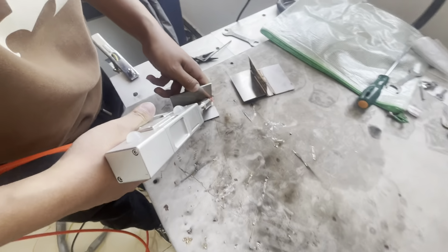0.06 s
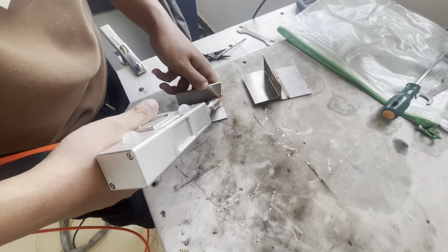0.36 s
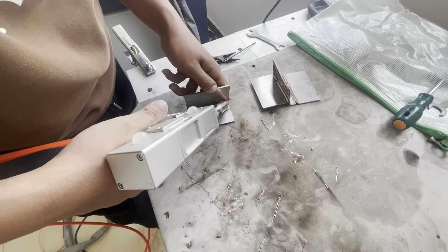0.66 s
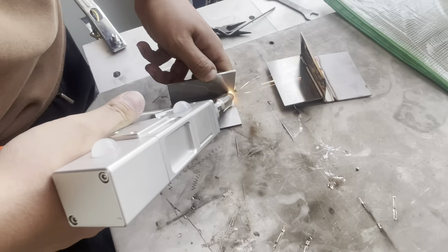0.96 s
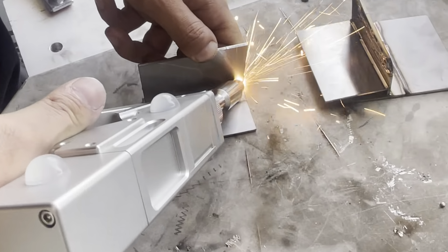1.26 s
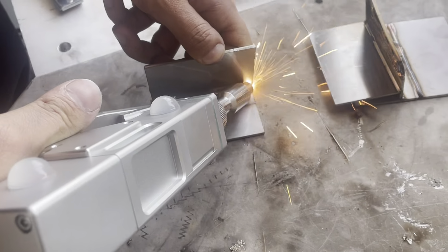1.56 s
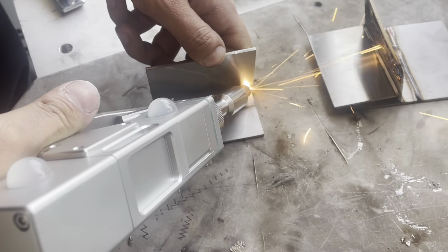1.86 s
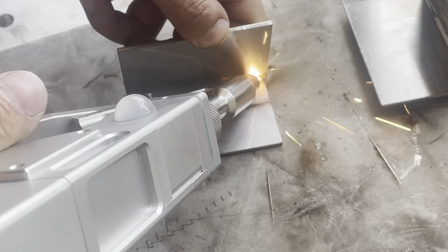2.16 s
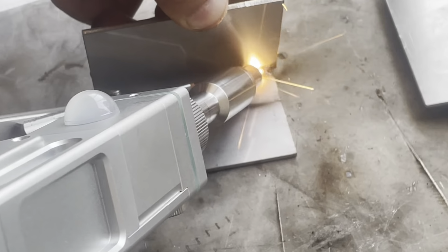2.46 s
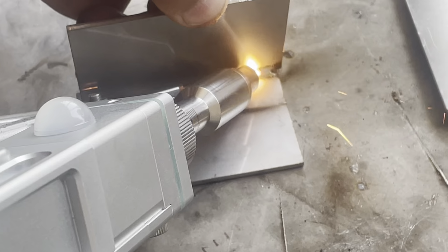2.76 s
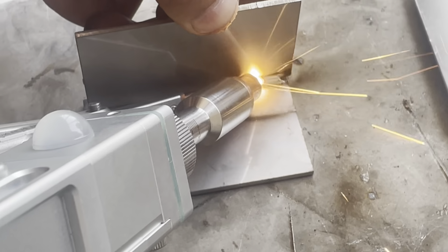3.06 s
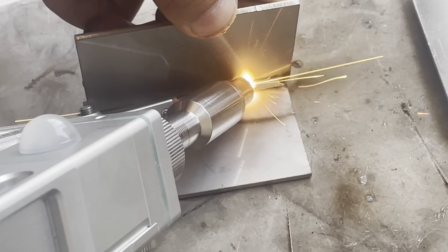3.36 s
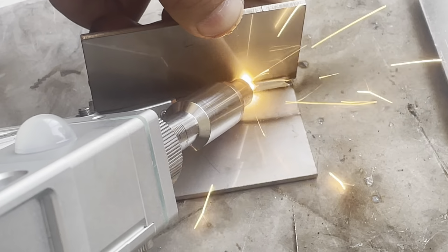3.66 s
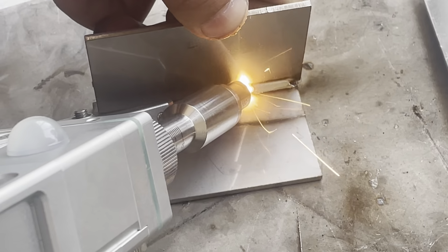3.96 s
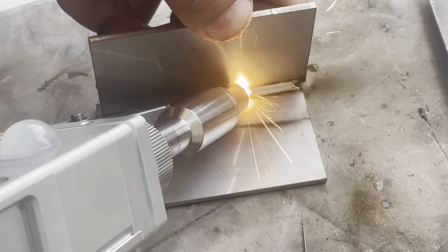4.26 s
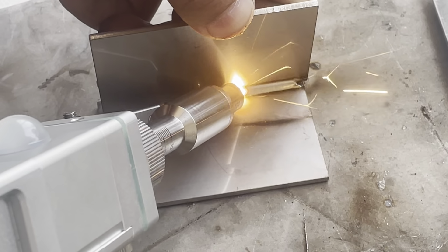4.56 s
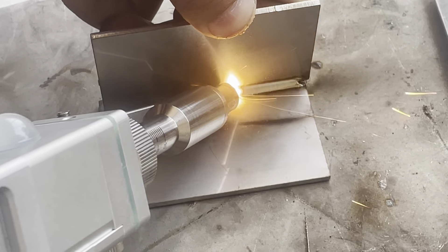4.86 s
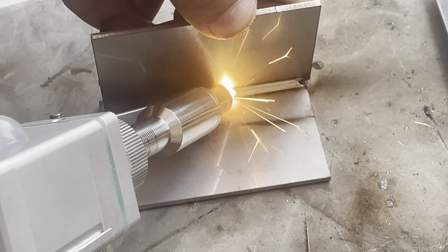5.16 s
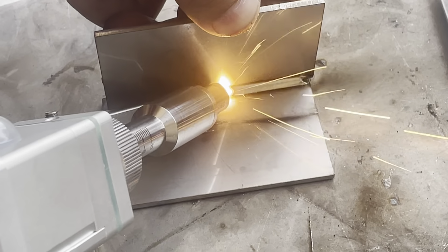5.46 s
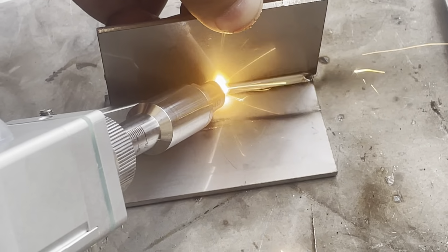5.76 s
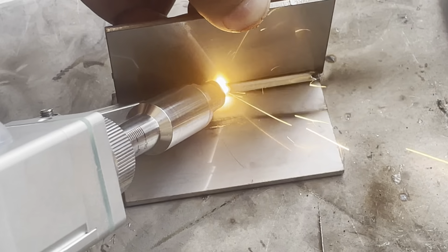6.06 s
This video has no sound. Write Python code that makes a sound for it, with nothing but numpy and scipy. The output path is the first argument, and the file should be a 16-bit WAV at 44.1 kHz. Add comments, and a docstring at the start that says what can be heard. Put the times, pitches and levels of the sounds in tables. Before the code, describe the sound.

A machine hum, a trigger click and a rush of gas, then a handheld laser welder sizzles steadily on steel.

```python
"""Handheld laser weld on a steel angle.

Over the machine's hum the trigger clicks, shield gas rushes out with a thump, and the beam strikes.
The beam sweeps the corner 37 times a second, so the vapour plume sizzles in throbs and spits sparks.
The phone zooms in on the weld: hum and gas fade, the stereo image narrows."""
import sys
import numpy as np
from scipy import signal
from scipy.fft import rfft, irfft, next_fast_len
from scipy.io import wavfile
from scipy.ndimage import uniform_filter1d

SR = 44100
rng = np.random.default_rng(int(sys.argv[2]) if len(sys.argv) > 2 else 0)


def int16_out(signal):
    """Quantize to a 16-bit WAV file."""
    q = np.round(np.clip(np.atleast_2d(signal).T, -1, 1) * 32767)
    wavfile.write(sys.argv[1], SR, q.astype(np.int16))


N = 269892
T = np.arange(N) / SR
FFT_SIZE = next_fast_len(N + SR // 4)
HZ = np.fft.rfftfreq(FFT_SIZE, 1 / SR)

GAS_ON_S, THUMP_S, BEAM_ON_S = 0.5445, 0.570, 0.831
SWEEP_HZ = 37.0

# audio zoom steps: (start [s], duration [s], share of full zoom [-])
ZOOM_STEPS = [(0.996, 0.31, 0.59), (2.12, 0.94, 0.45)]
# microphone ports, wide and zoomed: (frequency [Hz], left lead [rad], coherence [0-1], L-R [dB])
IMAGE_WIDE = [(99, 0.5, 0.93, -6), (550, 2, 0, 4.5), (1420, 2, 0.37, 1), (2680, 4.5, 0.94, -1.5),
              (4300, -0.5, 0.97, -2), (4670, 1, 0, 8), (5900, -1, 0.4, 1), (7260, -2, 0.73, 1.5),
              (9530, -4.5, 0.8, -1.5), (10600, -6.5, 1, -6), (11900, -5, 0.9, 1), (13800, -9.5, 0.93, 0)]
IMAGE_ZOOMED = [(100, 0, .98, 0), (700, .15, .93, 2), (1450, .6, .75, 7), (1800, 0, .75, 0),
                (2000, 0, 1, 0), (6000, 0, 1, 0), (7200, -1.3, .92, 0), (8200, -3.14, 1, 0),
                (10200, -4.9, .95, 0), (10900, -6.28, 1, 0), (11900, -6.28, 1, 0), (13300, -7.8, .8, 0),
                (14100, -9.1, .97, 0), (14800, -9.42, 1, 0)]
# narrow peaks and notches that colour the gas hiss and sizzle: (frequency [Hz], width [Hz], gain [dB])
HISS_COLOUR = [(750, 35, -5), (1120, 40, -5), (1430, 45, 2), (1605, 40, -4.5), (1790, 50, -11),
               (2130, 22, -4), (2290, 35, 2.5), (2660, 40, -4), (4220, 50, 3), (4330, 35, -3),
               (4750, 210, 8.5), (5085, 96, -9), (6480, 40, 3), (6870, 116, 4.5), (7245, 97, -5),
               (7800, 150, 5), (8130, 110, -12), (8550, 150, 2.5), (9030, 330, 3.5), (9500, 90, -2),
               (9900, 190, 4), (10690, 175, -8), (11490, 90, -6), (12440, 350, 3.5), (13830, 250, -9),
               (14970, 400, 11)]
# machine hum: (harmonic [-], relative level [dB], share of the fade [-])
HUM_HARMONICS = [(1, 1, 1), (2, -10, 0.31), (3, -18, 1), (4, -6, 0.72), (5, -23, 1), (6, -22, 1),
                 (7, -22, 0.6), (8, -25, 1), (9, -23, 1)]
# electronics whine: (frequency [Hz], level before zoom [dB])
WHINE_TONES = [(2406, -68), (2676, -75), (3079, -72), (3208, -76), (3343, -72.5), (3747, -75), (4280, -76),
               (5351, -81), (8662, -87), (9200, -76), (9733, -89), (10804, -79)]
# workshop air: (frequency [Hz], relative density [dB])
AIR_SPECTRUM = [(20, -18), (35, -13), (55, 1.5), (90, -8), (170, -11.5), (270, -5), (500, -12), (900, -22),
                (2400, -21), (6000, -40.5), (8000, -38), (11000, -45), (14000, -75)]
# steady drone: (frequency [Hz], width [Hz], level [dB])
DRONE_BANDS = [(74.5, 13, -64), (131, 34, -65), (266.6, 12, -64.5), (517, 41, -67.5)]
# trigger clicks: (time [s], level [dB])
TRIGGER_CLICKS = [(0.5045, -35), (.509, -44)]
# click noise: (frequency [Hz], relative density [dB])
CLICK_SPECTRUM = [(300, -20), (1800, -8), (3000, 1), (5000, 5), (9000, 3), (16000, -26)]
# switch ring: (frequency [Hz], level re click [dB], t60 [s])
SWITCH_MODES = [(3140, 3, 0.014), (3500, -10, .014), (4400, -24, .06), (5200, 2, 0.014), (5760, -20, 0.08)]
# valve crack, steady gas, first spurt: (frequency [Hz], relative density [dB])
CRACK_SPECTRUM = [(300, -6), (2500, -16), (4200, -11), (5200, -24), (6000, -3), (7200, -17), (8200, 13),
                  (9600, -3), (10700, 8), (11800, -22), (16000, -21)]
GAS_SPECTRUM = [(50, -12), (200, -8.5), (560, -4), (800, -6), (1480, -0.5), (1850, -4), (3700, -10),
                (4400, -9), (5700, -19), (6750, -11.5), (7250, -1), (7700, -9), (8100, -3), (8600, -13),
                (9200, -7), (9800, -8), (10700, -11), (11200, -8.5), (12000, -27), (13000, -22),
                (14500, -52)]
SPURT_SPECTRUM = [(200, -1), (1500, -6), (2500, 5), (4500, 2), (6000, -11), (7600, 6), (8800, 5),
                  (10500, -11), (12200, -28), (16000, -45)]
# nozzle bore: (frequency [Hz], width [Hz], relative level [dB], change with pool [dB])
BORE_MODES = [(4360, 210, -3, -15), (4600, 88, -6, -13), (4880, 290, 1, 9.5)]
# gas line thump: (frequency [Hz], relative level [dB], t60 [s])
THUMP_MODES = [(264, -25, 0.033), (272, -42, .25), (507, -26, 0.016), (548, -39.5, 0.44),
               (573, -17.5, 0.031), (1080, -27, 0.02), (1550, -32.5, 0.045)]
# gun and steel corner: (frequency [Hz], width [Hz], relative level [dB], change with beam [dB])
CORNER_MODES = [(267.6, 25, -8.5, 7), (548, 72, -2.5, -4.5), (1050, 120, -14.5, 9.5), (1298, 20, -10, 3.5),
                (1480, 71, -2, 0), (2420, 87, -16.5, 13.5), (2670, 63, -8, 6)]
# beam's first spit: (frequency [Hz], relative density [dB])
STRIKE_SPECTRUM = [(300, -12), (1500, 2), (3800, -2), (4900, 4), (5700, -6), (6800, -1), (8300, -8),
                   (10000, 6), (11300, -10), (13700, -10), (15200, 2)]
# plume flares: (place in sweep [0-1], width [sweeps], height on steel [dB], height on pool [dB])
SWEEP_FLARES = [(.19, .04, -6, -5.5), (.305, 0.038, 4.5, -4), (.42, .035, -12, -7), (.59, 0.033, 1.5, -4.5),
                (.795, 0.029, 6, -2), (.9, 0.046, -4, -3.5)]
# plume strength: (time [s], relative level [dB])
PLUME_LEVELS = [(0.84, -27), (0.95, -25.5), (1.52, -25), (1.72, -28), (1.81, -28.7), (1.92, -25),
                (3.1, -29.5), (4.2, -27.5), (6.0, -27.5)]
# plume sizzle, low puffs: (frequency [Hz], relative density [dB])
SIZZLE_SPECTRUM = [(100, -40), (1000, -23), (1750, -21), (2350, -11.5), (3200, -8), (6000, -4), (9000, 1),
                   (13000, -5.5), (15750, -9.5)]
PUFF_SPECTRUM = [(60, -20), (170, 0), (310, -6), (520, -0.5), (700, 3.5), (1050, -2.5), (1700, -9),
                 (3000, -30), (16000, -70)]
# plume buzz: (harmonic of the sweep [-], relative level [dB])
BUZZ_HARMONICS = [(2, -22), (3, -1), (4, -9), (5, -2), (6, -1.5), (7, -6), (8, -8), (9, -7), (10, -14)]
# droplets bursting on bare steel: (time [s], level [dB])
DROPLET_BURSTS = [(0.8708, -17), (0.899, -17), (1.008, -25), (1.1418, -17.5), (1.3583, -22)]
# extra peaks and notches at half zoom: (frequency [Hz], width [Hz], gain [dB])
MID_ZOOM_COLOUR = [(4140, 42, -3.5), (4150, 70, -3), (4980, 55, 2.5), (5200, 110, -3.5), (5780, 130, 1.5),
                   (6040, 51, -12), (6830, 70, 3), (7440, 70, -9)]


def amp(db):
    """Decibels to gain."""
    return 10 ** (np.asarray(db) / 20)


def unit(x):
    """Scale to rms 1."""
    return x / np.sqrt(np.mean(x ** 2) + 1e-20)


def noise_pair():
    """Two independent white noises."""
    return rng.standard_normal((2, N))


def filtered(x, gain):
    """Apply a gain per frequency bin."""
    return irfft(rfft(x, FFT_SIZE) * gain, FFT_SIZE)[..., :N]


def wander(rate_hz):
    """Smooth random drift, rms 1."""
    return unit(filtered(rng.standard_normal(N), 1 / (1 + (HZ / rate_hz) ** 4)))


def ramp(start_s, rise_s):
    """Linear rise from 0 to 1."""
    return np.clip((T - start_s) / rise_s, 0, 1)


def since(start_s):
    """Seconds elapsed; 0 before the start."""
    return np.maximum(T - start_s, 0)


def settle(start_s, tau_s):
    """1 until the start, then exponential decay."""
    return np.exp(-since(start_s) / tau_s)


def decay(start_s, t60_s):
    """1 until the start, then down 60 dB per t60."""
    return amp(-60 * since(start_s) / t60_s)


def ring(start_s, modes):
    """Damped sines, struck once."""
    t = since(start_s)
    return sum(amp(db) * decay(start_s, t60_s) * np.sin(2 * np.pi * hz * t) for hz, db, t60_s in modes)


def spectrum(rows):
    """Table columns per bin, interpolated over log frequency."""
    hz, *columns = np.transpose(rows)
    return [np.interp(np.log(HZ + 1), np.log(hz + 1), column) for column in columns]


def noise_gain(shape):
    """Spectrum table to gain per bin, rms 1."""
    return unit(amp(spectrum(shape)[0]))


def ripple_db(rows):
    """Bell-shaped peaks and notches per bin."""
    return sum(db * np.exp(-.5 * ((HZ - hz) / width_hz) ** 2) for hz, width_hz, db in rows)


def hiss_gain(shape, lo_hz, hi_hz):
    """Spectrum with narrow peaks and notches; gives white noise rms 1 in the band."""
    gain = amp(spectrum(shape)[0] + ripple_db(HISS_COLOUR))
    return gain / np.sqrt(np.mean(gain ** 2 * ((HZ > lo_hz) & (HZ < hi_hz))))


def zoom():
    """Audio zoom, 0 to about 1."""
    return sum(share * ramp(start_s, duration_s) for start_s, duration_s, share in ZOOM_STEPS)


def narrowing():
    """Share of the narrow image; takes over during the first zoom step."""
    return ramp(1.08, rise_s=0.21)


def melt_pool():
    """Growth of the melt pool, 0-1."""
    return ramp(1.6, rise_s=0.3)


def ports(pair, gain, layout=IMAGE_WIDE):
    """Colour two independent signals and blend them into left and right."""
    lead_rad, coherence, balance_db = spectrum(layout)
    coherence = np.clip(coherence, 0, 1)
    left = gain * amp(balance_db / 2)
    right = gain * amp(-balance_db / 2) * np.exp(-1j * lead_rad)
    shared = filtered(pair[0], right * coherence)
    separate = filtered(pair[1], right * np.sqrt(1 - coherence ** 2))
    return np.array([filtered(pair[0], left), shared + separate])


def zoomed_ports(pair, gain):
    """Crossfade from the wide image to the narrow one."""
    narrow = narrowing()
    return (1 - narrow) * ports(pair, gain) + narrow * ports(pair, gain, IMAGE_ZOOMED)


def resonances(pair, modes, change):
    """Noise drives modes whose levels shift as change goes from 0 to 1."""
    before = after = 0
    for hz, width_hz, db, change_db in modes:
        peak = unit(1 / (1 + (2 * (HZ - hz) / width_hz) ** 2) ** 1.55)
        before = before + peak * amp(db)
        after = after + peak * amp(db + change_db)
    return zoomed_ports((1 - change) * filtered(pair, before) + change * filtered(pair, after), 0.89)


def bench_echoes(pair, echo_db, count=14):
    """Early reflections off bench, plates and gun ripple the hiss."""
    delays_s = rng.uniform(0.0011, 0.009, count)
    taps = np.zeros(N)
    taps[0] = 1
    taps[np.round(delays_s * SR).astype(int)] = rng.choice([-1, 1], count) * amp(echo_db)
    return filtered(pair, rfft(taps / np.linalg.norm(taps), FFT_SIZE))


def workshop(hum_hz=134, hum_db=-46, air_db=-49, zoom_db=-19.5):
    """Machine hum, electronics whine and room air fade with the zoom; a soft drone stays."""
    fade_db = zoom_db * zoom()
    phase_rad = 2 * np.pi * hum_hz * T + 0.042 * wander(2.4) + np.array([[0], [.12]])
    shimmer_db = 1.5 * wander(19)
    hum = 0
    for k, db, fade_share in HUM_HARMONICS:
        level_db = hum_db + db + fade_share * fade_db + (k > 1) * shimmer_db
        hum = hum + amp(level_db) * np.sin(k * phase_rad + 2 * np.pi * rng.random())
    whine = sum(amp(db + fade_db) * np.sin(2 * np.pi * hz * T) for hz, db in WHINE_TONES)
    air = zoomed_ports(noise_pair(), noise_gain(AIR_SPECTRUM)) * amp(air_db + 0.55 * fade_db)
    drone = 0
    for hz, width_hz, db in DRONE_BANDS:
        band = 1 / (1 + (2 * (HZ - hz) / width_hz) ** 2)
        drone = drone + amp(db) * unit(filtered(rng.standard_normal(N), band))
    return np.sqrt(2) * (hum + whine) + air + drone


def trigger(rise_s=0.0011, t60_s=0.009, tail_db=-22, tail_t60_s=0.54):
    """Dry clicks with a faint room tail; the first rings the switch."""
    envelope = 0
    for start_s, db in TRIGGER_CLICKS:
        peak_s = start_s + rise_s
        fall = decay(peak_s, t60_s) + amp(tail_db) * decay(peak_s, tail_t60_s)
        envelope = envelope + amp(db) * ramp(start_s, rise_s) * fall
    first_s, first_db = TRIGGER_CLICKS[0]
    switch = amp(first_db) * ring(first_s, SWITCH_MODES) * ramp(first_s, rise_s)
    return switch + ports(noise_pair() * envelope, noise_gain(CLICK_SPECTRUM))


def valve_crack(snap_db=-32, spit_db=-27):
    """The valve snaps open; stored pressure escapes in one bright spit."""
    opening = ramp(GAS_ON_S, 0.0011)
    snap = noise_pair() * amp(snap_db) * decay(GAS_ON_S, t60_s=0.032) * opening
    spit = noise_pair() * amp(spit_db) * decay(GAS_ON_S, t60_s=0.19) * opening
    return ports(spit, noise_gain(CRACK_SPECTRUM)) + ports(snap, 1)


def shield_gas(base_db=-35, start_db=-7, pool_db=-3.5, zoom_db=-12, spurt_db=-32):
    """Turbulent rush after a brighter spurt; dulls as the zoom begins."""
    opening = ramp(GAS_ON_S, 0.0032)
    level_db = base_db + start_db * settle(GAS_ON_S, 0.35)
    level_db += pool_db * melt_pool() + zoom_db * zoom()
    flow = amp(level_db + 1.5 * wander(93)) * opening
    turbulence = bench_echoes(noise_pair() * flow, echo_db=-16)
    rush = zoomed_ports(turbulence, hiss_gain(GAS_SPECTRUM, 290, 1980))
    highs = filtered(rush, 1 / (1 + (900 / (HZ + 1)) ** 6))
    dull_db = -3 * ramp(0.95, 0.14)
    spurt = noise_pair() * amp(spurt_db) * settle(GAS_ON_S, 0.14) * opening
    return rush + highs * (amp(dull_db) - 1) + ports(spurt, noise_gain(SPURT_SPECTRUM))


def nozzle_whistle(base_db=-33, start_db=-26, zoom_db=-26.5, flutter_db=1.2):
    """The bore whistles on three close resonances as the flow builds."""
    level_db = base_db + start_db * settle(GAS_ON_S, 0.11) + zoom_db * zoom()
    flow = amp(level_db + flutter_db * wander(27)) * ramp(GAS_ON_S, 0.01)
    return resonances(noise_pair() * flow, BORE_MODES, melt_pool())


def gas_thump(left_db=2.5, right_db=0.5):
    """The line comes up to pressure; the surge strikes a few low modes."""
    return ring(THUMP_S, THUMP_MODES) * ramp(THUMP_S, 0.002) * amp([[left_db], [right_db]])


def hollow_corner(base_db=-41.5, zoom_db=-20.5, gust_db=3.5):
    """Gas blows across gun and steel corner; the plume drives most of their modes harder."""
    flow = amp(base_db + zoom_db * zoom() + gust_db * wander(11)) * ramp(THUMP_S, 0.018)
    return resonances(noise_pair() * flow, CORNER_MODES, ramp(BEAM_ON_S, 0.005))


def beam_strike(spit_db=-18, ring_db=-27, ring_t60_s=0.037):
    """The beam bites cold steel: one bright spit, which rings the nozzle."""
    start_s = BEAM_ON_S + 0.00061
    spit = noise_pair() * (T > start_s) * amp(spit_db) * decay(start_s, t60_s=0.017)
    bore_hz = BORE_MODES[-1][0]
    return ring(start_s, [(bore_hz, ring_db, ring_t60_s)]) + ports(spit, noise_gain(STRIKE_SPECTRUM))


def sweep_pulse(place, width, skew=1.33):
    """One pulse per sweep, rising faster than it falls."""
    offset = (T * SWEEP_HZ - place + .5) % 1 - .5
    return np.exp(-.5 * (offset / (width * skew ** np.sign(offset))) ** 2)


def plume_throb(rest_db=-3, uneven_db=1.0):
    """Plume power, mean about 1: flares in each sweep, evened out by the pool; a sag at the turn."""
    pool = melt_pool()
    power = amp(rest_db) ** 2
    for place, width, steel_db, pool_db in SWEEP_FLARES:
        height = amp(steel_db + pool * (pool_db - steel_db) + uneven_db * wander(34))
        power = power + height ** 2 * sweep_pulse(place, width)
    power *= 1 - 0.75 * sweep_pulse(place=0.098, width=0.028)
    return power / uniform_filter1d(power, round(4 * SR / SWEEP_HZ))


def sizzle(throb, plume_db, trim_db=1.78, spits_per_s=1000, spit_db=9):
    """Vapour jets from the melt in fluttering throbs; bursting droplets add fine crackle."""
    spits = (rng.random(N) < spits_per_s / SR) * rng.uniform(0.37, 1, N)
    spits = spits * rng.choice([-1, 1], (2, N))
    jet = noise_pair() + amp(spit_db) * spits
    flutter_db = 0.5 * wander(310) + 0.49 * wander(7.9)
    jet *= np.sqrt(throb) * amp(plume_db + trim_db + flutter_db) * ramp(BEAM_ON_S, 0.0018)
    return zoomed_ports(bench_echoes(jet, echo_db=-26), hiss_gain(SIZZLE_SPECTRUM, 2000, 9140))


def seam_colour(hiss, zoom_db=6.5, sink_db_per_s=2.04, cold_db=-2, hot_db=2.4):
    """Brighter with the zoom; as the seam heats, the top sinks and the body fills in."""
    top = filtered(hiss, 1 / (1 + (10800 / (HZ + 1)) ** 24))
    body = filtered(hiss, 1 / (1 + (HZ / 3500) ** 8))
    top_db = zoom_db * zoom() ** 2 - sink_db_per_s * (T - BEAM_ON_S)
    body_db = narrowing() * (hot_db + (cold_db - hot_db) * settle(BEAM_ON_S, 1.9))
    return hiss + top * (amp(top_db) - 1) + body * (amp(body_db) - 1)


def puffs(throb, plume_db, base_db=-40.5, start_db=6.5, pool_db=-8.5, zoom_db=-8):
    """Flares shove the gas aside: a lumpy low sputter, strongest as the plume lights."""
    level_db = base_db + start_db * settle(BEAM_ON_S, 0.074) + 0.9 * (plume_db - plume_db.max())
    level_db += pool_db * melt_pool() + zoom_db * zoom()
    flow = np.sqrt(throb) * amp(level_db + 1.8 * wander(13)) * ramp(BEAM_ON_S, 0.002)
    return zoomed_ports(noise_pair() * flow, hiss_gain(PUFF_SPECTRUM, 100, 1200))


def buzz(base_db=-45.5, start_db=-27, pool_db=-11, zoom_db=-10, uneven_db=2.5):
    """Flares push the air: low harmonics of the sweep that swell, then calm on the pool."""
    tone = 0
    for k, db in BUZZ_HARMONICS:
        gain = amp(db + uneven_db * wander(4.1))
        tone = tone + gain * np.sin(2 * np.pi * (k * SWEEP_HZ * T + rng.random()))
    level_db = base_db + start_db * settle(BEAM_ON_S, 0.11)
    level_db += pool_db * melt_pool() + zoom_db * zoom()
    return np.sqrt(2) * tone * amp(level_db) * ramp(BEAM_ON_S, 0.011)


def spatter(rise_s=0.0026, t60_s=0.05, pop_db=-19):
    """Droplets burst from the melt, each a hard spit with a low pop."""
    envelope = sum(amp(db) * ramp(at_s, rise_s) * decay(at_s, t60_s) for at_s, db in DROPLET_BURSTS)
    gain = hiss_gain(SIZZLE_SPECTRUM, 2000, 9140) + amp(pop_db) * hiss_gain(PUFF_SPECTRUM, 100, 1200)
    return zoomed_ports(noise_pair() * envelope, gain)


def mid_zoom_colour(hiss):
    """Extra peaks and notches come and go in the hiss, deepest at half zoom."""
    depth = np.clip(4 * zoom() * (1 - zoom()), 0, 1)
    return hiss + depth * filtered(hiss, amp(ripple_db(MID_ZOOM_COLOUR)) - 1)


def scene():
    """Workshop, trigger, gas, then the weld."""
    throb = plume_throb()
    plume_db = np.interp(T, *np.transpose(PLUME_LEVELS))
    weld = beam_strike() + mid_zoom_colour(seam_colour(sizzle(throb, plume_db)))
    weld += spatter() + puffs(throb, plume_db) + buzz()
    machine = workshop() + trigger()
    gas = valve_crack() + shield_gas() + gas_thump() + hollow_corner() + nozzle_whistle()
    return machine + gas + weld


def record(dry):
    """The phone's band limit."""
    cutoff_hz = 15750
    lowpass = signal.firwin(511, cutoff_hz, window=("kaiser", 9), fs=SR)
    return signal.oaconvolve(dry, lowpass[None], "same", axes=1)


dry = scene()
out = record(dry)
int16_out(out)
```